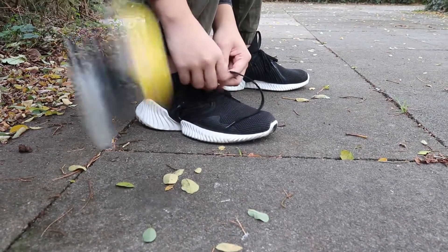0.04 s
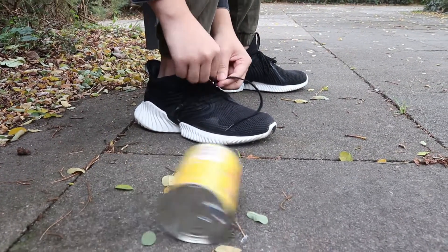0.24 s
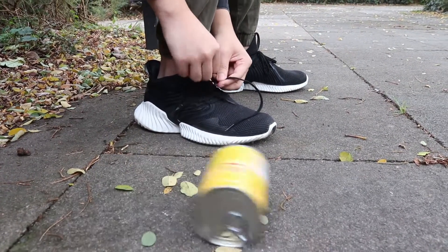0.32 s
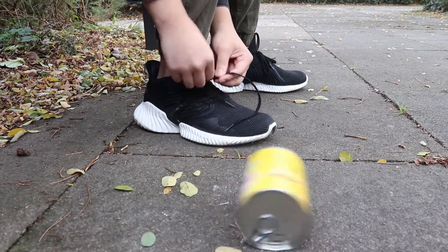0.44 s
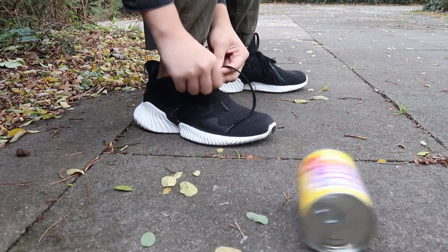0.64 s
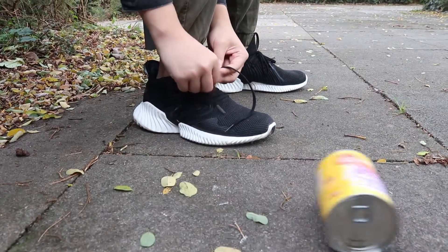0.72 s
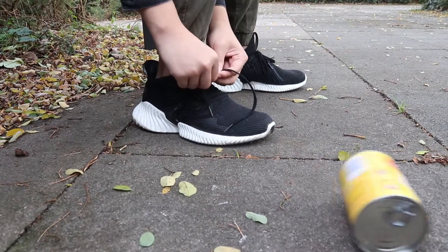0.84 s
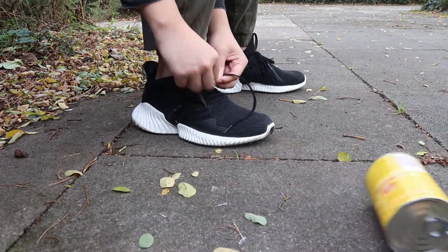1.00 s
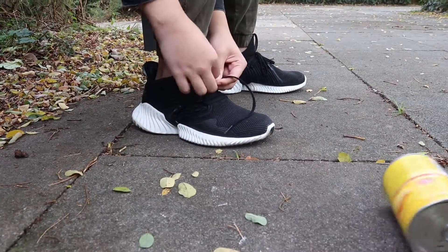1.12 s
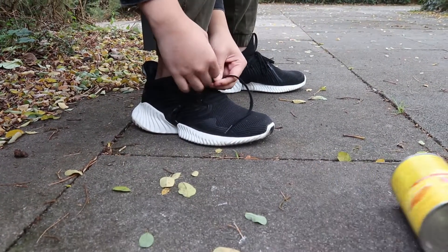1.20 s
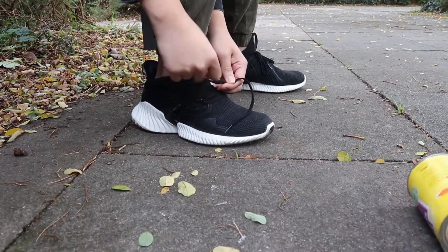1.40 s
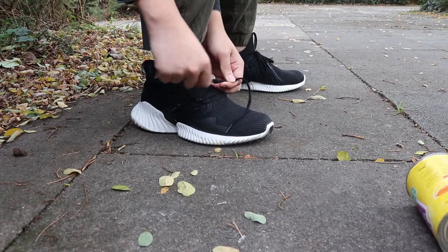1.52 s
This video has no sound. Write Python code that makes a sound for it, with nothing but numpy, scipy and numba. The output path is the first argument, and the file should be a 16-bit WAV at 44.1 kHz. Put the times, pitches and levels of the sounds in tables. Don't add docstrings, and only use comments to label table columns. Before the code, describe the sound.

A full metal food tin hits concrete at about 0.23 seconds, after faint distant traffic: a short, harsh, overloaded clank with little ring. From 0.32 it knocks and rolls, dull hollow thumps mixed with gritty scraping and tiny metallic rim ticks, busiest until 0.85. The rumble slows and weakens to 1.5, when a distant low drone and barely audible whine swell in. Close phone microphone, open air, dry.

```python
import sys
import numpy as np
from scipy import signal
from scipy.io import wavfile
from scipy.ndimage import uniform_filter1d
from numba import njit

SR = 44100
rng = np.random.default_rng(int(sys.argv[2]) if len(sys.argv) > 2 else 0)


def materialize(psi):
    bounded = np.clip(np.atleast_2d(psi).T, -1, 1)
    quanta = np.round(bounded * 32767).astype(np.int16)
    wavfile.write(sys.argv[1], SR, quanta)


def volts(x):
    e = np.asarray(x, float) / 20
    return 10 ** e


N = 68355
T = np.arange(N) / SR
MID_SIDE = np.array([[1], [-1]])


def unit(x):
    return x / np.sqrt(np.mean(x ** 2))


@njit
def svf(x, hz, width):
    y, b, l = np.empty(len(x)), 0., 0.
    for i in range(len(x)):
        g, k = np.tan(np.pi * hz[i] / SR), width / hz[i]
        v = (b + g * (x[i] - l)) / (1 + g * (g + k))
        b, l = 2 * v - b, l + 2 * g * v
        y[i] = k * v
    return y


def band(x, hz, width):
    return svf(x, np.full(N, 1. * hz), 1. * width)


def fade(start, t60, rise=0.00044, hold=0.):
    t = np.maximum(T - start, 0)
    return (1 - np.exp(-t / rise)) * volts(-60 * np.maximum(t - hold, 0) / t60)


def ring(start, hz, t60, turn, rise=0.0001, hold=0.):
    return fade(start, t60, rise, hold) * np.sin(2 * np.pi * (hz * (T - start) + turn))


def walk(rate):
    k = int(SR / rate)
    steps = np.repeat(rng.standard_normal(N // k + 1), k)
    return 0.32 * uniform_filter1d(uniform_filter1d(steps, k), k)[:N]


def curve(table, col=1):
    return np.interp(T, np.array(table)[:, 0], np.array(table)[:, col])


TOWN_DB, TOWN_FADE_DB_S = -46.5, -0.5
SWELL_DB, FLICKER_DB = .7, -1.5
SIDE_FULL_HZ = 2500
# pitch_hz [Hz], density_db [dB per Hz]
TOWN_SPECTRUM = [(25, 3.5), (75, 8), (240, 5.5), (450, -1), (1150, -7.5), (3000, -19), (9000, -21),
                 (15600, -37)]


def town():
    out, swell = 0, walk(0.55)
    pitch_hz, density_db = np.transpose(TOWN_SPECTRUM)
    for hz in 30 * 2 ** np.arange(0, 9.1, .5):
        mid, side = (unit(band(band(rng.standard_normal(N), hz, hz / 2), hz, hz / 2)) for _ in range(2))
        db = np.interp(np.log(hz), np.log(pitch_hz), density_db)
        db = db + SWELL_DB * swell + FLICKER_DB * walk(2.3)
        side_gain = min(.1 + hz / SIDE_FULL_HZ, 1)
        out = out + volts(db) * np.sqrt(hz) * (mid + side_gain * side * MID_SIDE)
    return unit(out) * volts(TOWN_DB + TOWN_FADE_DB_S * T)


DROP_S, DROP_DB, DROP_HOLD_S, DROP_WIDE_HZ = .2346, 17, 0.0022, 13050
SECOND_RIM_S, SECOND_RIM_DB = .0083, -13.5
CRACK_DB, CRACK_T60_S, TAIL_DB, TAIL_T60_S = -4, 0.016, -34.5, 0.14
THUD_DB, THUD_HZ, THUD_T60_S = -22, 45.3, 0.043
# pitch_hz [Hz], level_db [dB], t60_s [s]
SHELL_MODES = [(316.2, -15.5, 0.11), (274, -33.5, 0.1), (158, -14, 0.026), (564, -9.5, 0.0072),
               (927, -9.5, 0.026), (1505, -6.5, 0.011), (1874, -6, 0.0073), (2155, -5, 0.01),
               (2521.4, 0, 0.01), (3085, -5, 0.014), (3423, -8, 0.0075), (3720, -2.5, 0.0096),
               (4301, -9, 0.034), (5770, -4, 0.021)]


def drop():
    blows = ((DROP_S, 0), (DROP_S + SECOND_RIM_S, SECOND_RIM_DB))
    modes = np.zeros((2, N))
    for hz, level_db, t60 in SHELL_MODES:
        start_turn, side_draw = rng.random(2)
        middle = start_turn if hz > 400 else .5
        spread = np.sign(side_draw - .5) * (0.066 + hz / DROP_WIDE_HZ) / 2
        for port, sign in enumerate((-1, 1)):
            for start, blow_db in blows:
                mode = ring(start, hz, t60, middle + sign * spread, rise=0.00038, hold=DROP_HOLD_S)
                modes[port] += volts(level_db + blow_db) * mode
    noise = rng.standard_normal((3, N))
    crash = np.array([band(n, 2800, 10000) for n in noise[:2]])
    crash = crash + volts(10.0) * band(noise[2], 1050, 1500)
    crack = sum(volts(CRACK_DB + blow_db) * fade(start, CRACK_T60_S, rise=0.0011, hold=DROP_HOLD_S)
                for start, blow_db in blows)
    tail = volts(TAIL_DB) * fade(DROP_S, TAIL_T60_S)
    thud = volts(THUD_DB) * ring(DROP_S, THUD_HZ, THUD_T60_S, 0, rise=0.0023)
    return volts(DROP_DB) * 0.49 * (modes + crash * (crack + tail) + thud)


# pitch_hz [Hz], level_db [dB], t60_s [s]
LID_MODES = [(537, 5, 0.072), (681, 7.5, 0.029), (854, 5, 0.063), (1150, 0.5, 0.04), (1348, -1, 0.038)]


def lids(x):
    return unit(sum((-1) ** k * volts(db) * band(x, hz, 130) for k, (hz, db, _) in enumerate(LID_MODES)))


# pitch_hz [Hz], width_hz [Hz], level_db [dB]
RIM_RESONANCES = [(1920, 470, 0), (3290, 740, 0), (4750, 750, -7.5), (5730, 370, -7.5)]


def rims(x):
    return unit(sum((-1) ** k * volts(db) * band(band(x, hz, width), hz, 2 * width)
                    for k, (hz, width, db) in enumerate(RIM_RESONANCES)))


# start_s [s], end_s [s]; a span that ends before it starts is empty
LOUDER_SPANS = [
    (.6, 0.56),
    (.706, 0.84),
]


def rolling_gain():
    in_span = sum((T > start) & (T < end) for start, end in LOUDER_SPANS)
    return volts(1 * uniform_filter1d(1. * in_span, size=180))


GRIT_PER_S, GRIT_DB, GRIT_FADE_DB_S = 1000, -20.5, -20.5
GRIT_RIM_DB, GRIT_TOP_DB = -6.5, -28.5
# start_s [s], level_db [dB], pitch_hz [Hz]
ROLLING = [(0.3, -63, 275), (0.32, -18, 279), (0.5, -16.5, 220), (0.522, -18, 262), (0.564, -11.5, 197),
           (0.644, -26, 231), (0.682, -22.5, 218), (0.808, -17, 214), (0.828, -19, 232), (0.89, -24.5, 205),
           (0.984, -29, 210), (1.012, -24.5, 207), (1.134, -21.5, 228), (1.166, -20.5, 234.4),
           (1.2, -22.5, 222), (1.34, -25, 226), (1.382, -30, 177), (1.55, -27, 158)]


def roll():
    grit = (rng.random(N) < GRIT_PER_S / SR) * rng.standard_normal(N) * volts(1.7 * walk(59.5))
    top = unit(band(band(grit, 12600, 2500), 12600, 2500))
    shake = lids(grit) + volts(GRIT_RIM_DB) * rims(grit) + volts(GRIT_TOP_DB) * top
    age = T - ROLLING[0][0]
    return volts(curve(ROLLING) + GRIT_DB + GRIT_FADE_DB_S * age) * (age > 0) * rolling_gain() * shake


BUMP_T60_S, BUMP_RISE_S, BUMP_DB = 0.079, 0.0029, 0
ROLL_DB, ROLL_WIDTH_HZ, WALL_HZ = -15, 81, (126, 331)
# start_s [s], level_db [dB],
# pitch_hz [Hz]
WALL_THUMPS = [(0.3157, -10.5, 314), (0.322, -19.5, 166), (0.3257, -15.5, 324), (0.3302, -11.9, 290),
               (0.3423, -18.5, 223), (0.3657, -16.5, 294), (0.3772, -18.5, 235), (0.3927, -18, 264),
               (0.4028, -8.5, 299), (0.4129, -15.5, 195), (0.427, -18.5, 294), (0.4424, -14, 212),
               (0.461, -24.5, 203), (0.4684, -18, 268), (0.5006, -16, 245), (0.5178, -8.5, 268),
               (0.5255, -14, 182), (0.5378, -20.5, 239), (0.549, -15.5, 149), (0.5555, -22.5, 291),
               (0.5631, -11, 243), (0.5687, -21.5, 143), (0.5796, -16, 183), (0.6122, -24, 195),
               (0.621, -14.0, 267.6), (0.6501, -20, 237), (0.6639, -13, 257), (0.6768, -14, 189.5),
               (0.6877, -20, 209), (0.6952, -24.5, 268), (0.7188, -22, 171), (0.7227, -8.5, 205),
               (0.7376, -20, 219), (0.7492, -11.5, 214), (0.7723, -15.5, 228.6), (0.7988, -20, 212),
               (0.8096, -21, 254), (0.8142, -9.5, 226), (0.8206, -20.5, 138), (0.824, -14, 268),
               (0.8296, -21.5, 280), (0.834, -9.5, 192), (0.8429, -20.5, 265), (0.8467, -15, 197),
               (0.8642, -14.5, 221), (0.8835, -22.5, 273), (0.8949, -14.5, 192), (0.9192, -18, 169),
               (0.9309, -18, 219), (0.9583, -20.5, 259), (0.9803, -18, 189), (1.0033, -13.5, 198),
               (1.0136, -24.5, 252.4), (1.0304, -14, 218), (1.0612, -18, 211), (1.1115, -21.0, 220),
               (1.16, -21, 190), (1.3064, -19.5, 210)]


def wall():
    thumps = sum(volts(db + BUMP_DB) * ring(start, hz, BUMP_T60_S, 0, rise=BUMP_RISE_S)
                 for start, db, hz in WALL_THUMPS)
    bounce_hz = curve(ROLLING, col=2) * (1 + 0.097 * walk(29.95))
    rough = svf(rng.standard_normal(N), bounce_hz, 1. * ROLL_WIDTH_HZ)
    rumble = unit(svf(rough, bounce_hz, 2. * ROLL_WIDTH_HZ))
    rolling = volts(ROLL_DB + curve(ROLLING)) * (T > ROLLING[0][0])
    body = thumps + rolling * rumble * rolling_gain()
    return signal.sosfilt(signal.butter(2, WALL_HZ, "bandpass", fs=SR, output="sos"), body)


KNOCK_T60_S, KNOCK_DB, OTHER_LIDS_DB = 0.049, -0.5, -11.5
SCRAPE_DB, SCRAPE_T60_S = -17, 0.069
# start_s [s], level_db [dB], pitch_hz [Hz]
PANEL_KNOCKS = [(0.3152, -22.5, 544), (0.3192, -28.5, 847), (0.3237, -19.5, 1098), (0.3282, -17.5, 539),
                (0.3322, -17.5, 890), (0.3392, -31, 524), (0.3499, -31.5, 988), (0.3544, -22.5, 662),
                (0.361, -27, 555), (0.383, -34, 546), (0.3974, -22.5, 620), (0.4092, -27, 560),
                (0.4203, -20.5, 540), (0.4584, -25.5, 555), (0.4628, -20.5, 701), (0.4701, -22, 607),
                (0.4834, -30.5, 670), (0.5066, -25.5, 650), (0.515, -22, 900), (0.5215, -25.5, 506),
                (0.5261, -28, 760), (0.5368, -23.5, 845), (0.6252, -20, 552.5), (0.6331, -29.5, 510),
                (0.6528, -25, 537), (0.6785, -27.5, 524), (0.7206, -23.5, 870), (0.7255, -23.5, 540),
                (0.8227, -25.5, 552), (0.835, -26, 548)]


def knocks():
    out, scrape = 0, lids(rng.standard_normal(N))
    for start, level_db, panel_hz in PANEL_KNOCKS:
        panel = ring(start, panel_hz, KNOCK_T60_S, 0, rise=0.00048)
        others = 0
        for hz, db, t60 in LID_MODES:
            share, detune = rng.random(2)
            mode = ring(start, hz * (.95 + 0.14 * detune), t60, 0, rise=0.0016)
            others = others + volts(db + 8.7 * (share - 1)) * mode
        rub = scrape * fade(start, SCRAPE_T60_S, rise=0.0015)
        knock = panel + volts(OTHER_LIDS_DB) * others + volts(SCRAPE_DB) * rub
        out = out + volts(level_db + KNOCK_DB) * knock
    return out


TICK_T60_S, TICK_DB, TICK_RIM_DB = 0.0084, -0.5, -5.5
TICK_TAIL_DB, TICK_TAIL_T60_S = -18.5, 0.043
SNAP_DB, SNAP_T60_S = -20.5, 0.0028
# start_s [s], level_db [dB], pitch_hz [Hz]
RIM_TICKS = [(0.316, -29, 3460), (0.3308, -11, 2930), (0.3495, -39.5, 4520), (0.3531, -19.5, 2850),
             (0.3825, -33.5, 3450), (0.3994, -27.5, 3270), (0.4026, -30.5, 3570), (0.4104, -32.5, 3220),
             (0.4187, -37, 3530), (0.443, -34.5, 3200), (0.4519, -35, 3600), (0.4628, -25.5, 3270),
             (0.4725, -34.5, 2150), (0.476, -37.5, 3400), (0.5055, -28, 2750), (0.5148, -26, 2790),
             (0.5185, -35, 2490), (0.5228, -23, 2880), (0.527, -43.5, 1930), (0.5321, -32, 3700),
             (0.5389, -32.5, 2430), (0.5586, -43.5, 2410), (0.5667, -47, 2280), (0.573, -45.5, 3120),
             (0.5755, -43, 2550), (0.5835, -39, 3200), (0.587, -31, 2150), (0.6238, -32, 2340),
             (0.6281, -50, 2280), (0.6407, -45.5, 2230), (0.651, -45.5, 1980), (0.6542, -35.5, 3010),
             (0.6713, -39.3, 2450), (0.677, -39.5, 3050), (0.6835, -45.5, 3140), (0.6886, -46, 3480),
             (0.7227, -28, 3310), (0.73, -42, 3180), (0.7486, -36.5, 4300), (0.753, -38.5, 3440),
             (0.7715, -48, 2600), (0.8157, -46, 4830), (0.8239, -32.5, 2700), (0.8345, -36, 4600),
             (0.8404, -39.5, 2790), (0.927, -50, 4390), (1.019, -40.5, 4770), (1.457, -42, 4950)]


def ticks():
    noise = rng.standard_normal((2, N))
    rim, hiss = rims(noise[0]), unit(band(noise[1], 12000, 7000))
    out = 0
    for start, level_db, hz in RIM_TICKS:
        ping = ring(start, hz, TICK_T60_S, 0, rise=0.00013)
        snap = volts(SNAP_DB) * fade(start, SNAP_T60_S, rise=.0001) * hiss
        rim_fade = volts(TICK_RIM_DB) * fade(start, TICK_T60_S, rise=0.00017)
        tail_fade = volts(TICK_TAIL_DB) * fade(start, TICK_TAIL_T60_S)
        out = out + volts(level_db + TICK_DB) * (ping + snap + rim * (rim_fade + tail_fade))
    return out


SCATTER_DB, SCATTER_T60_S, SCATTER_FROM_HZ = -2, 0.01, 1500


def scatter(x):
    n = int(.02 * SR)
    echo = unit(rng.standard_normal(n) * volts(-60 * T[:n] / SCATTER_T60_S)) / np.sqrt(n)
    bright = signal.lfilter(*signal.butter(1, SCATTER_FROM_HZ, "high", fs=SR), x)
    return volts(SCATTER_DB) * signal.fftconvolve(bright, echo)[:N]


DRONE_HZ = 82.4
WHINE_HZ, WHINE_DB, WHINE_S = 1331, -60.5, 1.23
# start_s [s], level_db [dB]
DRONE_SWELL = [
    (1.32, -56),
    (1.392, -33),
    (1.412, -28.5),
    (1.466, -34),
    (1.524, -30.5),
    (1.55, -27.5),
]


def machine():
    drone_turn = np.cumsum(DRONE_HZ * (1 + .01 * walk(20))) / SR
    drone_in = np.clip((T - DRONE_SWELL[0][0]) / 0.023, 0, 1)
    drone = volts(curve(DRONE_SWELL)) * drone_in * np.sin(2 * np.pi * drone_turn)
    whine_in = np.clip((T - WHINE_S) / 0.063, 0, 1)
    whine = volts(WHINE_DB) * whine_in * np.sin(2 * np.pi * WHINE_HZ * T)
    return np.sqrt(2) * (drone + whine)


PAN_DB_PER_S, WALL_SIDE_DB = 0.5, -26


def scene():
    tin, body = ticks() + knocks() + roll(), wall()
    pan = volts(np.clip(PAN_DB_PER_S * T, -4, 0) * np.array([[.5], [-.5]]))
    side = scatter(tin) + volts(WALL_SIDE_DB) * np.roll(body, 50)
    return tin * pan + body + side * MID_SIDE + drop() + machine() + town()


def band_limit(x):
    return signal.sosfilt(signal.butter(12, 15760, fs=SR, output="sos"), x)


def record(dry):
    clip = .97
    return band_limit(np.clip(dry, -clip, clip))


dry = scene()
out = record(dry)
materialize(out)
```